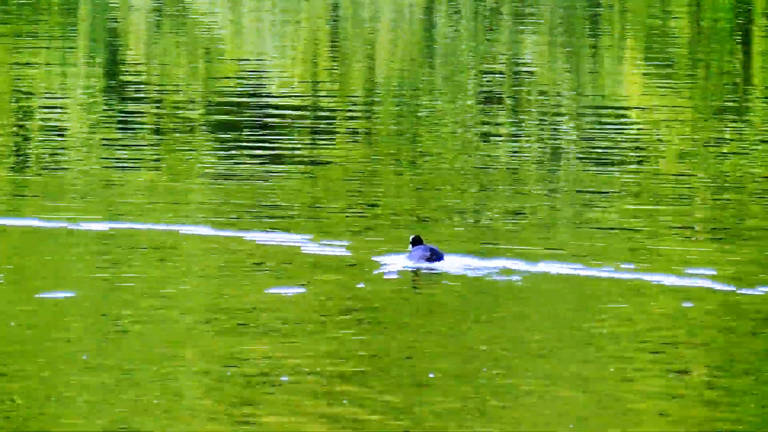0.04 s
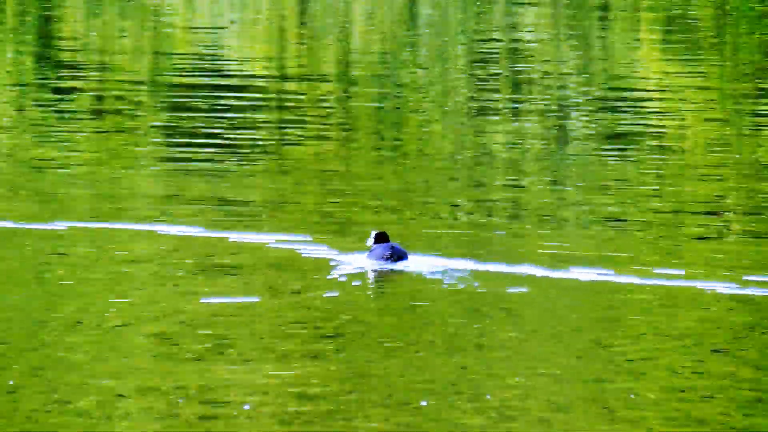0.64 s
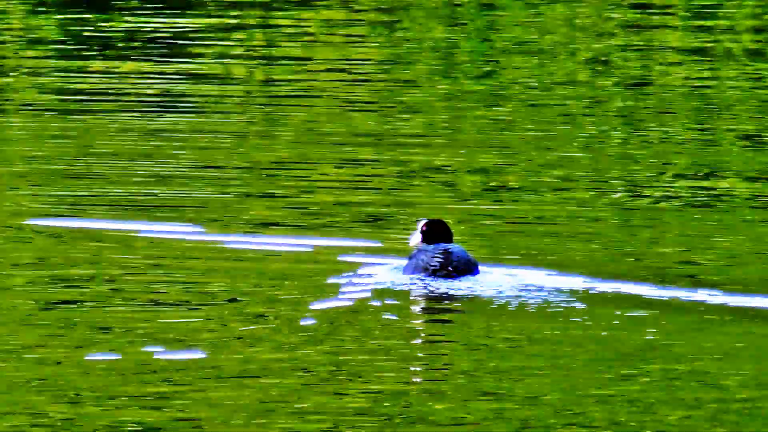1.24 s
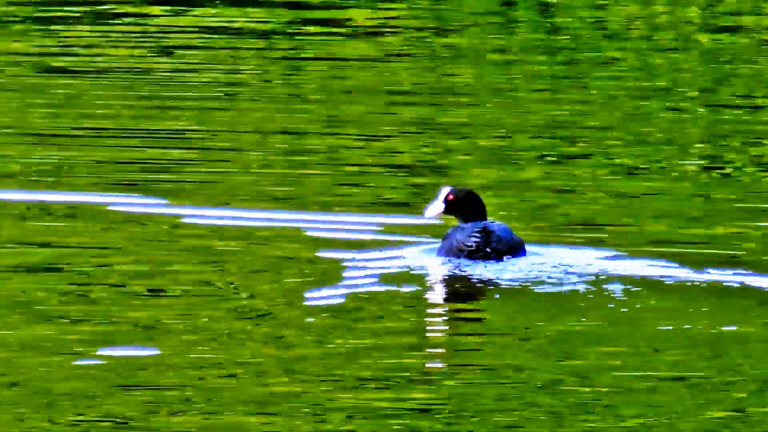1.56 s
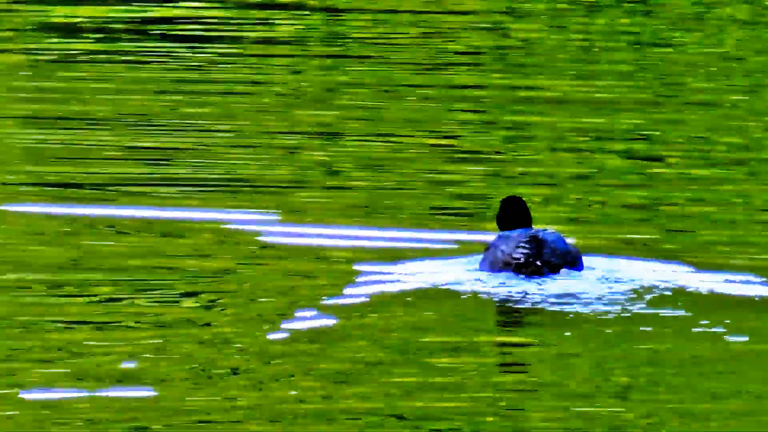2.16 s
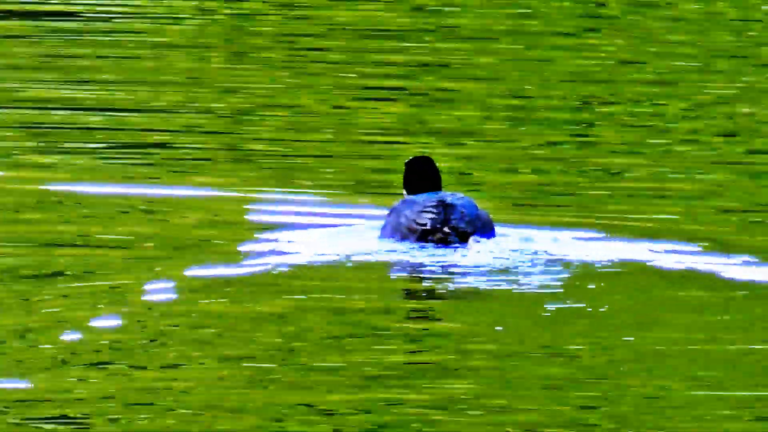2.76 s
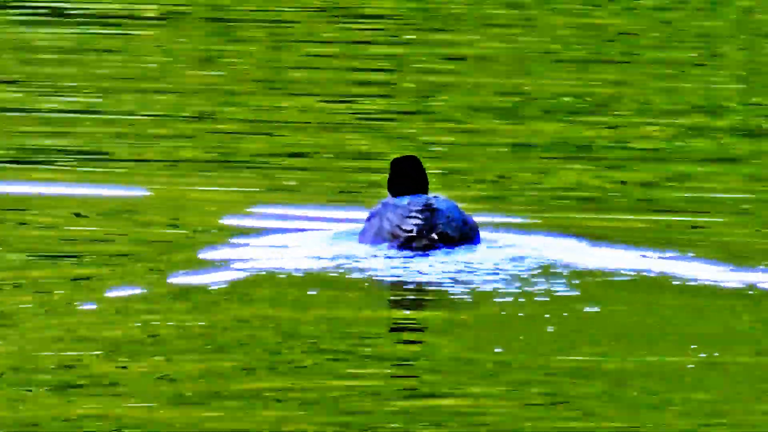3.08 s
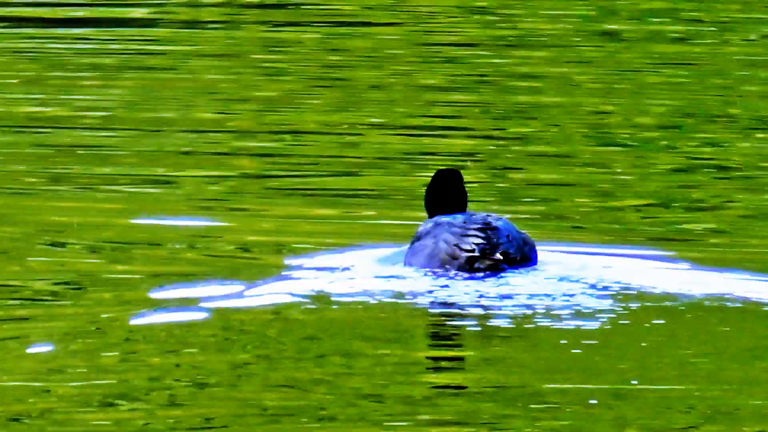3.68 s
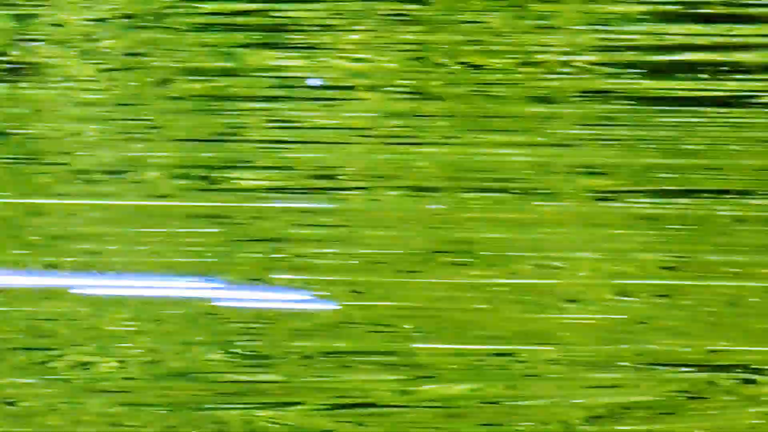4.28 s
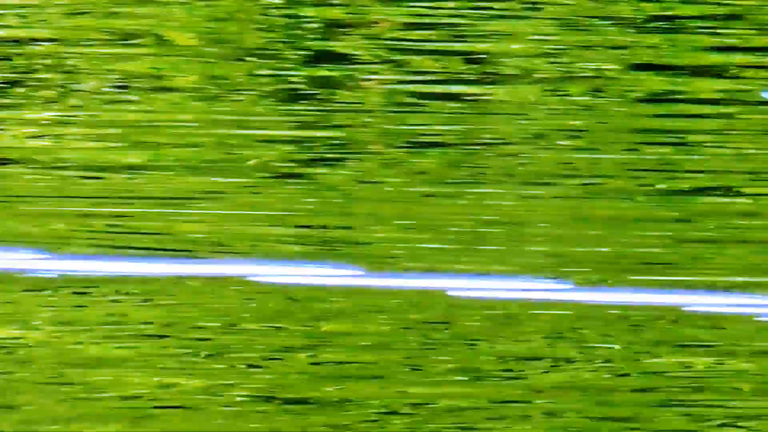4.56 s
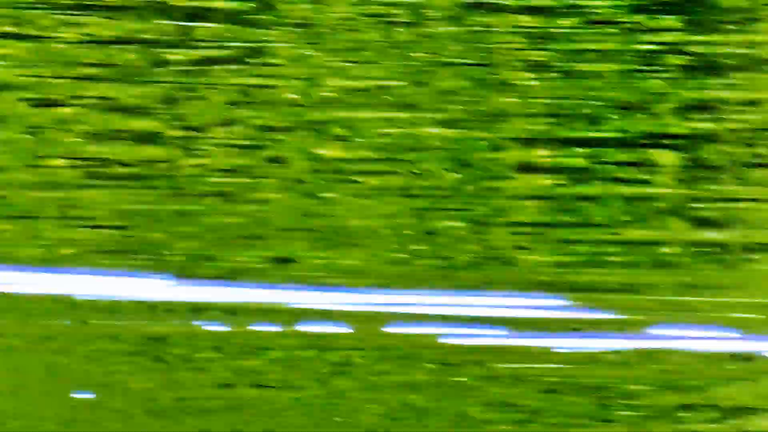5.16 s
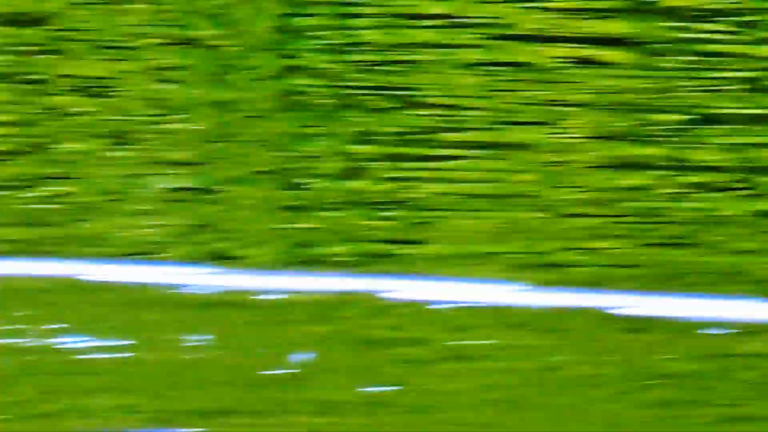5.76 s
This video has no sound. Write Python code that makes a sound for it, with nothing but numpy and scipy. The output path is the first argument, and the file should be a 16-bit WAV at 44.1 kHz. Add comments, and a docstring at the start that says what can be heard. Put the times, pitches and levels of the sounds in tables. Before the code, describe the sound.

Birdsong echoes softly around a wooded pond, one bird close and several distant, over a faint rumble of breeze.

```python
"""Birdsong by a pond

A songbird in the trees sings swoops, quick twits, down-slurs, then a raspy twitter; other birds add
fainter buzzes. Each note is a near-pure syrinx tone; an unsteady membrane adds rasp. More birds whistle,
pipe and warble farther off; branches, trunks and the wooded bank echo them all. Light wind rumbles,
mostly on the right of the microphone; the camera gives a few handling ticks and bumps."""
import sys
import numpy as np
from scipy import signal
from scipy.fft import rfft, irfft, next_fast_len
from scipy.io import wavfile
from scipy.ndimage import uniform_filter1d, map_coordinates

SR = 44100
rng = np.random.default_rng(int(sys.argv[2]) if len(sys.argv) > 2 else 0)


def generate_wav(sig):
    """Save sig (samples, or channels by samples) to the path in sys.argv[1] as 16-bit PCM at SR."""
    pcm = np.round(np.clip(np.atleast_2d(sig).T, -1, 1) * 32767).astype(np.int16)
    wavfile.write(sys.argv[1], SR, pcm)


N = 261072


def near_birds():
    """Syllable runs, raspy chips, a trill and buzzes, then fainter buzzes from other birds."""
    # Steep fall, rising hook: t/s, f/Hz, relative level/dB
    swoop = [(0, 7630, -30), (.007, 7000, -5.5), (.014, 6400, 1), (.028, 4900, -2.5), (.043, 3225, -1.5),
             (.05, 3600, -1), (.06, 4110, 1.5), (.068, 4400, -13)]
    # Upward flick, hook, high downstroke: t/s, f/Hz, relative level/dB
    twit = [(0, 4204, -5), (.009, 6590, -19), (.012, 3320, -17), (.016, 3644, -6), (.024, 4280, -0.5),
            (.035, 4326, 0), (.042, 4250, -20), (.043, 7050, -22), (.048, 6620, -8), (.057, 5550, -2),
            (.065, 5140, -24)]
    # Short chip, long flattening fall: t/s, f/Hz, relative level/dB
    slur = [(0, 3946, -6), (.006, 4617, -8.5), (.012, 3528, -3.5), (.017, 2910, -10.5), (.042, 4000, -32),
            (.049, 3876, -6.5), (.063, 3650, -4.5), (.075, 3390, 1.5), (.09, 2836, -7), (.107, 2576, -9),
            (.12, 2540, -29)]
    # High double upstroke: t/s, f/Hz, relative level/dB
    upstrokes = [(0, 6000, -2.5), (.024, 6670, -1.5), (.046, 7630, -1.5), (.05, 6290, -7), (.072, 7300, -5),
                 (.095, 7660, -10)]
    # Dip, rise, low drooping tail: t/s, f/Hz, relative level/dB
    dip = [(0, 3600, -16), (.005, 3444, -4), (.013, 2600, -12), (.021, 2247, -12.5), (.03, 2620, -8),
           (.038, 3110, -7.5), (.045, 2450, -22), (.056, 2170, -14), (.072, 1920, -18.5)]
    # Stuttering fall: scene t/s, f/Hz, relative level/dB
    fall = [(3.445, 4100, -27.5), (3.476, 3890, -20), (3.492, 3336, -18), (3.529, 2855, -23),
            (3.575, 2480, -23), (3.625, 2240, -30.5), (3.65, 2070, -34)]
    # Quick strokes up or down: t/s, length/s, start f/Hz, end f/Hz, relative level/dB
    chips = [(2.113, 0.022, 2480, 4200, -26), (2.245, .042, 8400, 6300, -35.5),
             (2.535, .037, 3590, 3100, -23.5), (2.73, .036, 4890, 3770, -22),
             (2.98, 0.042, 8200, 6170, -32.5), (3.064, .021, 5860, 4970, -26.5),
             (3.243, 0.032, 6600, 5570, -26.5), (3.265, 0.018, 3450, 3250, -21),
             (3.322, 0.02, 5300, 7440, -24.5), (3.338, .046, 4120, 2334, -19.5),
             (3.415, .035, 1950, 3000, -32), (3.753, 0.023, 3090, 2380, -23.5),
             (3.97, 0.035, 4450, 3690, -22), (4.07, .04, 3250, 2240, -26), (4.183, 0.0294, 4160, 3390, -23)]
    # Raspy held notes: t/s, length/s, f/Hz, relative level/dB
    buzzes = [(2.86, 0.045, 3420, -25), (3.226, 0.062, 5510, -26), (3.258, 0.028, 4700, -19),
              (3.55, 0.317, 4150, -25.5), (3.665, 0.084, 3880, -23.5), (3.875, 0.076, 3720, -22.5),
              (3.985, .12, 4034, -24.5), (4.51, .054, 6900, -40.5), (4.69, 0.093, 6850, -43),
              (4.897, 0.09, 4134, -29)]
    song = syllable_run(swoop, start_s=1.029, count=4, period_s=0.1557, db=-36, step_db=4,
                        rasp=0.018, pitch=1.03, sag=0.00794)
    song += syllable_run(twit, start_s=1.652, count=4, period_s=0.109, db=-21, step_db=1.22,
                         rasp=0.0082, pitch=1.003, seesaw=0.0177)
    song += syllable_run(slur, start_s=2.217, count=4, period_s=0.1765, db=-15, step_db=0.4,
                         rasp=0.012, rasp_step=0.0062, pitch=1.016, sag=0.00506)
    song += syllable_run(upstrokes, start_s=2.458, count=3, period_s=0.146, db=-30, step_db=0.5,
                         rasp=0.056)
    song += syllable_run(dip, start_s=2.908, count=3, period_s=0.106, db=-13, step_db=0.05,
                         rasp=0.027, pitch=1.014)
    mix_at(song, fall[0][0], trill(fall))
    song += slides(chips, mid_share=0.48, rasp=0.056)
    return song + held_notes(buzzes, sag=0.0052, rasp=0.053)


def syrinx(hz, gain, rasp, flutter_hz=900, overtone_db=-33):
    """Near-pure whistle; an unsteady membrane shakes pitch (by the fraction rasp) and level."""
    shaken_hz = hz * (1 + rasp * wobble(flutter_hz, len(hz)))
    phase = 2 * np.pi * np.cumsum(shaken_hz) / SR
    shake = unit_rms(amp(45 * rasp * wobble(flutter_hz / 2, len(hz))))
    return gain * shake * (np.sin(phase) + amp(overtone_db) * np.sin(2 * phase))


def syllable_run(syllable, start_s, count, period_s, db, step_db, rasp,
                 rasp_step=0, pitch=1, sag=0, seesaw=0):
    """Evenly paced repeats; level, rasp and pitch ratio step each time, and pitch may seesaw."""
    track = np.zeros(N)
    hz, gain = contour(syllable)
    for k in range(count):
        ratio = pitch - k * sag + seesaw * (-1) ** k
        note = syrinx(hz * ratio, gain * amp(db + k * step_db), rasp + k * rasp_step)
        mix_at(track, start_s + k * period_s, note)
    return track


def trill(syllable, rate_hz=68, depth=0.12, pulse_db=2):
    """One note broken into quick, uneven downward flicks."""
    hz, gain = contour(syllable)
    flick_hz = rate_hz * (1 + 0.22 * wobble(45.2, len(hz)))
    phase = 2 * np.pi * np.cumsum(flick_hz) / SR
    flicks = 1 - depth * signal.sawtooth(phase, width=0.85)
    return syrinx(hz * flicks, gain * amp(-pulse_db * np.cos(phase)), rasp=0.036)


def glides(notes):
    """Notes that swell and fade while pitch follows a parabola through three points."""
    track = np.zeros(N)
    for start_s, length_s, start_hz, mid_hz, end_hz, db, rasp in notes:
        u = np.linspace(0, 1, round(length_s * SR))
        hz = start_hz * (1 - u) * (1 - 2 * u) + 4 * mid_hz * u * (1 - u) + end_hz * u * (2 * u - 1)
        arch = np.sin(np.pi * u)
        swell = arch * np.sqrt(2 / (1 + arch ** 2))  # soft ends, broad top
        mix_at(track, start_s, syrinx(hz, amp(db) * swell, rasp))
    return track


def slides(notes, mid_share, rasp):
    """Notes sliding between two pitches, mid_share of the way there at half time."""
    return glides((start_s, length_s, from_hz, from_hz + mid_share * (to_hz - from_hz), to_hz, db, rasp)
                  for start_s, length_s, from_hz, to_hz, db in notes)


def held_notes(notes, sag, rasp):
    """Near-level notes, sinking from the fraction sag above pitch to sag below."""
    return glides((start_s, length_s, hz * (1 + sag), hz, hz * (1 - sag), db, rasp)
                  for start_s, length_s, hz, db in notes)


def far_birds():
    """Birds farther off: whistles, pipes, a fading run of tinks and a warble."""
    # Slides that level off: t/s, length/s, start f/Hz, end f/Hz, relative level/dB
    whistles = [(.214, 0.04, 4100, 2030, -36.5), (.53, 0.038, 2360, 1985, -39),
                (.672, 0.033, 6020, 4150, -32.5), (1.862, .08, 3560, 2230, -35),
                (2.003, 0.041, 2485, 2230, -35), (2.05, .086, 2520, 2740, -42),
                (4.253, 0.088, 3246, 2976, -24), (4.59, .11, 2940, 2570, -28.5),
                (4.739, .085, 3800, 2730, -27.5), (5.49, .075, 7100, 6000, -36.5),
                (5.63, 0.12, 6810, 4570, -30.5), (5.805, 0.14, 4780, 5240, -29)]
    # Pure, steady notes: t/s, length/s, f/Hz, relative level/dB
    pipes = [(.515, 0.051, 3894, -35.5), (.824, 0.045, 3860, -33), (.92, 0.062, 4790, -37),
             (.93, 0.11, 3890, -44), (1.13, .072, 3900, -36), (4.21, 0.032, 3980, -23.5),
             (4.39, 0.075, 2120, -43), (5.365, 0.054, 2890, -47), (5.395, 0.065, 4100, -27),
             (5.53, 0.058, 3240, -43), (5.83, 0.063, 3660, -40)]
    # Small falling syllable: t/s, f/Hz, relative level/dB
    tink = [(0, 5220, -10), (.018, 5040, -1.5), (.048, 4550, -6)]
    calls = slides(whistles, mid_share=0.7, rasp=0.015)
    calls += held_notes(pipes, sag=0.001, rasp=0.0018)
    calls += syllable_run(tink, start_s=4.264, count=6, period_s=0.099, db=-37, step_db=-0.6, rasp=0.005)
    return calls + warble()


def warble(start_s=5.245, count=14, period_s=0.027, note_s=0.0159, centre_hz=4200, db=-30):
    """A far bird's babble: tiny notes darting up or down around one pitch."""
    late, high, slope, loud = rng.standard_normal((count, 4)).T
    hz = centre_hz * np.exp(0.055 * high)
    bend = np.exp(0.048 * slope)
    onsets_s = start_s + period_s * (np.arange(count) + late / 10)
    notes = zip(onsets_s, np.full(count, note_s), hz * bend, hz / bend, db + 2 * loud)
    return slides(notes, mid_share=0.515, rasp=0.013)


def distant_birds():
    """Birds deep in the wood: three bands of chirps and a few lisps."""
    # Thin, very high notes: t/s, length/s, f/Hz, relative level/dB
    lisps = [(1.58, 0.97, 8200, -53.5), (2.25, 0.31, 8120, -41), (2.96, .18, 7630, -37.5),
             (3.1, 0.067, 7370, -34), (3.32, 0.14, 7400, -36.5), (3.44, 0.14, 7110, -36.5),
             (4.06, .21, 6130, -45), (4.8, 0.15, 7940, -41.5), (4.95, 0.2, 7790, -39)]
    chirps = chorus(centre_hz=4200, db=-46.5, count=150)
    chirps += chorus(centre_hz=6500, db=-49, count=170)
    chirps += chorus(centre_hz=2400, db=-55.5, count=70)
    return chirps + held_notes(lisps, sag=0.012, rasp=0.0285)


def chorus(centre_hz, db, count, note_s=0.05, rasp=0.0227, swell_db=2.5):
    """Faint, mostly falling chirps at irregular times, slowly growing louder."""
    late, high, slope, long, loud = rng.standard_normal((count, 5)).T
    progress = np.abs(np.arange(count) + late / 2) / count
    lengths_s = note_s * np.exp(long / 3)
    hz = centre_hz * np.exp(0.11 * np.clip(high, -2, 2))
    bend = np.exp(0.05 * (0.5 + slope))
    levels_db = db + loud + swell_db * (progress - 0.5)
    onsets_s = progress * N / SR
    return glides(zip(onsets_s, lengths_s, hz * bend, hz, hz / bend, levels_db, np.full(count, rasp)))


def woods(calls, branches_db, trunks_db, bank_db, branches_t60_s=0.15, bank_s=0.046, smear_s=0.003):
    """Branches blur each note, the bank returns one echo, trunks scatter a long tail."""
    # Decay among the trunks: f/Hz, t60/s
    trunks_t60 = [(1000, 0.18), (4000, 1), (8000, 0.65), (14000, 0.45)]
    t = np.arange(SR) / SR
    hz, frames_s, spectra = signal.stft(rng.standard_normal((3, SR)), SR, nperseg=256)
    decay = amp(-60 * frames_s / log_interp(trunks_t60, hz)[:, None])
    trunks = signal.istft(spectra * decay, SR, nperseg=256)[1][:, :SR]
    branches = rng.standard_normal((3, SR)) * amp(-60 * t / branches_t60_s)
    bank = rng.standard_normal((3, SR)) * np.exp(-0.5 * ((t - bank_s) / smear_s) ** 2)
    response = amp(branches_db) * unit_rms(branches) + amp(trunks_db) * unit_rms(trunks)
    response += amp(bank_db) * unit_rms(bank)
    echoes = signal.fftconvolve(calls[None], response / np.sqrt(SR), axes=1)[:, :N]
    return echoes[0] + 0.42 * echoes[1:]  # two close capsules share most echoes


def handling():
    """Short bursts of contact noise, each in a resonance of the camera body."""
    # Ticks and bumps: t/s, level/dB, resonance f/Hz, width/Hz, contact t60/s, left over right/dB
    contacts = [(.215, -27, 786, 1200, 0.016, -10), (.219, -18.5, 183, 169, 0.039, 6),
                (.345, -26, 7350, 7000, 0.011, -3), (.355, -36, 7000, 8000, .01, -5),
                (.382, -15.5, 7060, 6000, .011, -4), (.382, -30.5, 1800, 2500, 0.017, -6),
                (.784, -27, 690, 596, 0.014, -1), (.926, -22.5, 664, 400, 0.016, -3),
                (1.488, -25, 2260, 700, 0.016, 4), (1.488, -25, 900, 3200, 0.011, 7)]
    track = np.zeros((2, N))
    t = np.arange(SR // 10) / SR
    for start_s, db, centre_hz, width_hz, t60_s, left_db in contacts:
        def body(hz):
            return (1j * hz * width_hz / (centre_hz ** 2 - hz ** 2 + 1j * hz * width_hz)) ** 2
        decay = amp(db - 60 * t / t60_s)
        contact = rng.standard_normal(len(t)) * decay
        tick = unit_rms(filtered(contact, body)) * np.std(decay)
        mix_at(track, start_s, pan(left_db) * tick)
    return track


def wind():
    """Low buffeting on the microphone, a soft rush over the pond, a fine hiss of leaves."""
    # Gusts on the microphone: t/s, relative level/dB
    gusts = [(0, -37), (1.4, -33.5), (1.95, -28), (2.3, -30), (2.9, -25), (3.9, -27), (4.25, -32.5),
             (4.5, -29), (5, -30), (5.15, -27), (5.92, -29.5)]
    # Breeze strength: t/s, rush level/dB, hiss level/dB
    breeze = [(0, -39, -48.5), (.4, -36, -47.5), (1.3, -35, -48.5), (2, -33, -44.5), (3.3, -32, -41.5),
              (4.3, -32.5, -45), (5.1, -31.5, -43.5), (5.92, -33, -46.5)]
    # Buffet spectrum: f/Hz, relative density/dB
    buffet_shape = [(13, -48), (22, -17), (46, -4), (75, 3.5), (92, 1.5), (113, -10), (140, -6.5),
                    (220, -16.5), (290, -15.5), (480, -120)]
    # Rush spectrum: f/Hz, relative density/dB
    rush_shape = [(76, -25), (130, -1), (197, -4), (361, -10.5), (647, -12.5), (1060, -19), (1580, -31),
                  (1800, -30.5), (2340, -29), (3960, -120)]
    # Leaf hiss spectrum: f/Hz, relative density/dB
    hiss_shape = [(900, -16), (1500, 1.5), (2200, 2.5), (4000, 9), (5300, 2.5), (7000, 1.5), (9000, -1),
                  (12000, -3), (16000, -4)]
    gust_db, = curves(gusts)
    rush_db, hiss_db = curves(breeze)
    buffet_db = gust_db + 0.58 + 1.15 * wobble(rate_hz=15)
    buffet = amp(buffet_db) * air_noise(buffet_shape, coherence=0.5, left_db=-18, patch_db=-0.13)
    rush = amp(rush_db) * air_noise(rush_shape, coherence=0.44, left_db=-5.5, patch_db=1.01, lead_rad=1.57)
    hiss = amp(hiss_db) * air_noise(hiss_shape, coherence=0.4, left_db=0.5, patch_db=2.3)
    return buffet + rush + hiss


def air_noise(spectrum, coherence, left_db, patch_db, lead_rad=0):
    """Stereo noise with drifting patches of gain; mid rms 1, left phase ahead by lead_rad."""
    spectra = signal.stft(rng.standard_normal((2, N)), nperseg=512)[2]
    patches = uniform_filter1d(rng.standard_normal(spectra.shape[1:]), size=6, axis=0)
    patches = unit_rms(uniform_filter1d(patches, size=14, axis=1))
    mid, side = signal.istft(spectra * amp(patch_db * patches), nperseg=512)[1][:, :N]
    width_rad = np.arccos(coherence) / 2
    stereo = pan(left_db) * (np.cos(width_rad) * mid + np.sin(width_rad) * np.array([side, -side]))
    phase_shift = np.exp(1j * np.array([[lead_rad], [0]]))
    stereo = filtered(stereo, lambda hz: amp(log_interp(spectrum, hz)) * phase_shift)
    return stereo / np.std(stereo.mean(axis=0))


def contour(syllable):
    """Per-sample pitch/Hz, corners rounded, and gain."""
    knots_s, hz, db = np.transpose(syllable)
    t = np.arange(knots_s[0], knots_s[-1], 1 / SR)
    return uniform_filter1d(np.interp(t, knots_s, hz), size=90), amp(np.interp(t, knots_s, db))


def curves(rows):
    """Per-sample curve for each column after t/s."""
    knots_s, *columns = np.transpose(rows)
    return [np.interp(np.arange(N) / SR, knots_s, column) for column in columns]


def log_interp(points, hz):
    """Interpolate (f/Hz, value) points on a log frequency axis."""
    knots_hz, values = np.transpose(points)
    return np.interp(np.log(hz + 1), np.log(knots_hz + 1), values)


def wobble(rate_hz, size=N):
    """Smooth random curve, rate_hz knots a second."""
    knots = rng.standard_normal(size // 8 + 4)
    return map_coordinates(knots, [np.arange(size) * rate_hz / SR], mode="mirror")


def filtered(x, response):
    """Apply response(f/Hz) by FFT."""
    size = next_fast_len(x.shape[-1] + 8192)
    hz = np.fft.rfftfreq(size, 1 / SR)
    return irfft(rfft(x, size) * response(hz), size)[..., :x.shape[-1]]


def amp(db):
    """Decibels to gain."""
    return 10 ** (np.asarray(db) / 20)


def unit_rms(x):
    """Scale to rms 1."""
    return x / np.sqrt(np.mean(x ** 2) + 1e-20)


def pan(left_db):
    """Left and right gains; negative left_db leans right."""
    return amp(np.array([[left_db], [-left_db]]) / 2)


def mix_at(track, start_s, sound):
    """Add a sound in place, cut at the track's end."""
    part = track[..., max(0, round(start_s * SR)):][..., :sound.shape[-1]]
    part += sound[..., :part.shape[-1]]


def scene():
    """Near, far and distant birds among the trees, over handling ticks and wind."""
    near, far, distant = near_birds(), far_birds(), distant_birds()
    birds = amp(-2) * near + woods(near, branches_db=-5.5, trunks_db=-6.5, bank_db=-14)
    birds += amp(-4.5) * far + woods(far, branches_db=-9.5, trunks_db=-7, bank_db=-20)
    birds += woods(distant, branches_db=-3.5, trunks_db=-2, bank_db=-27)  # echoes only
    return pan(left_db=-0.78) * birds + handling() + wind()


def record(dry, limit_hz=15850):
    """The camera passes nothing above its band limit."""
    return filtered(dry, lambda hz: hz < limit_hz)


dry = scene()
out = record(dry)
generate_wav(out)
```